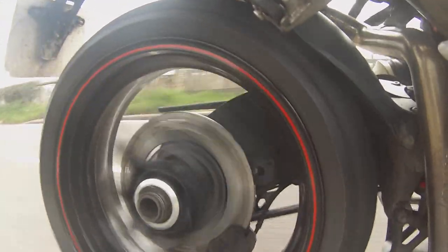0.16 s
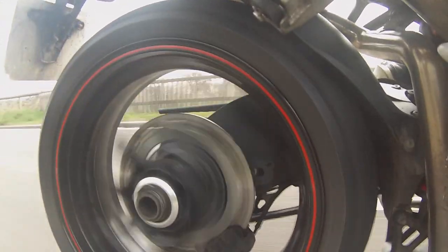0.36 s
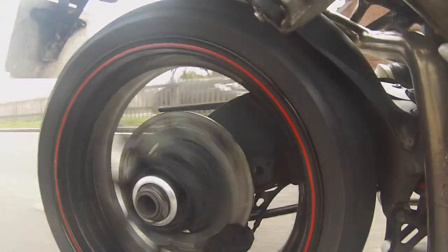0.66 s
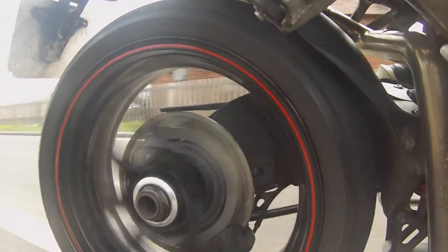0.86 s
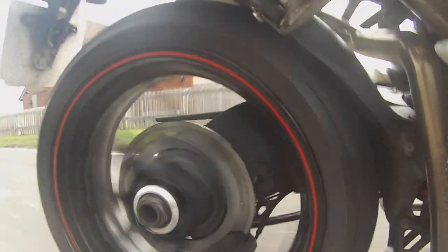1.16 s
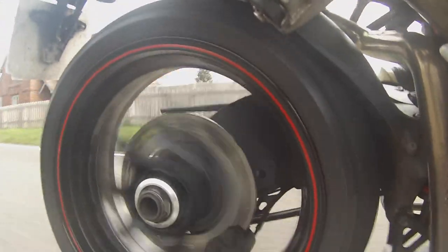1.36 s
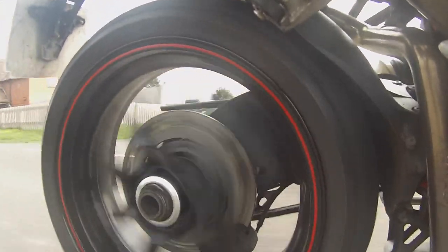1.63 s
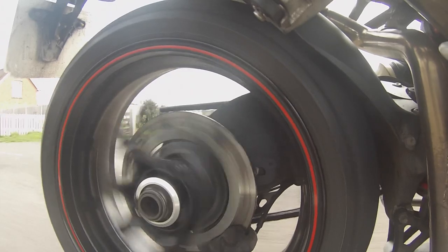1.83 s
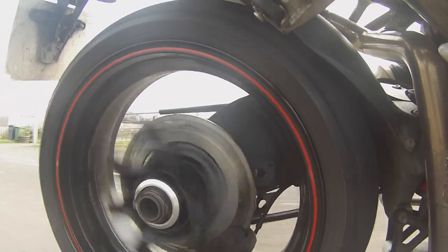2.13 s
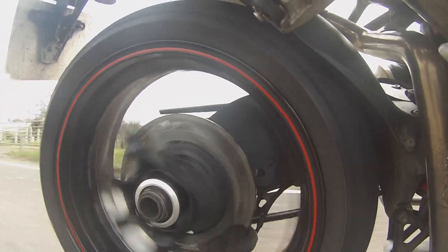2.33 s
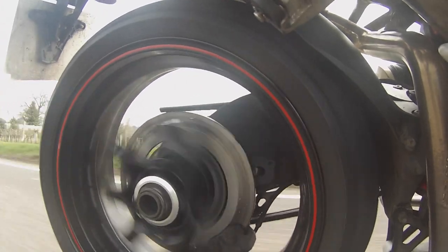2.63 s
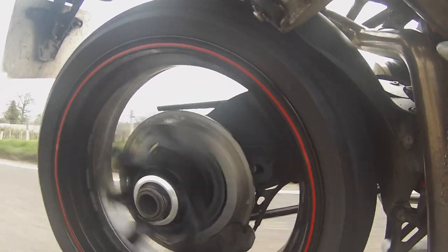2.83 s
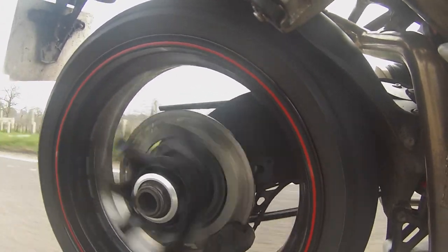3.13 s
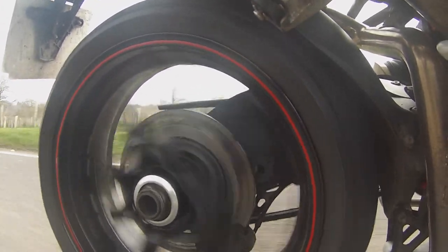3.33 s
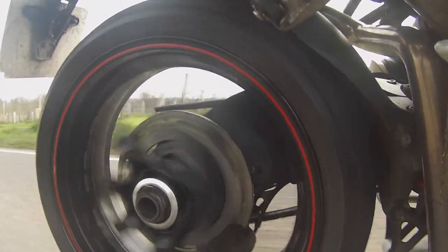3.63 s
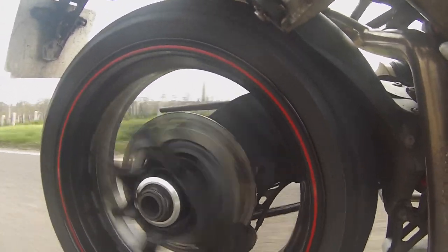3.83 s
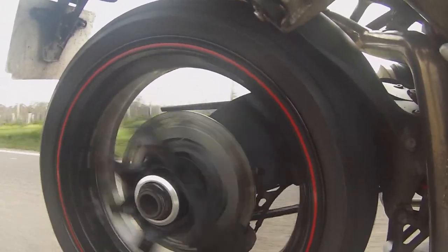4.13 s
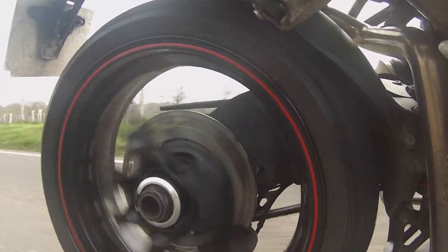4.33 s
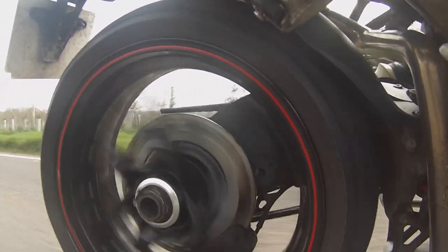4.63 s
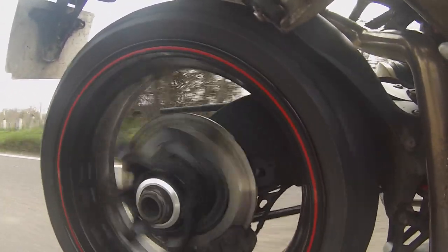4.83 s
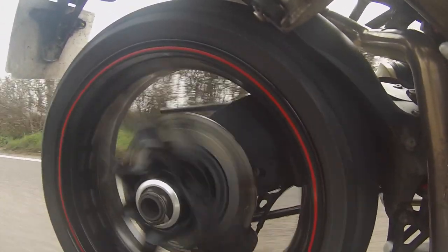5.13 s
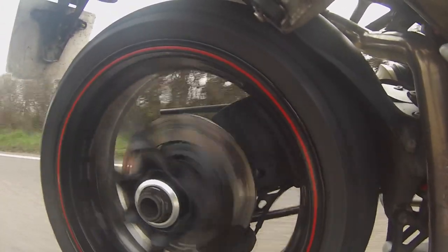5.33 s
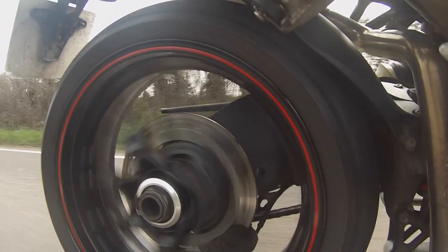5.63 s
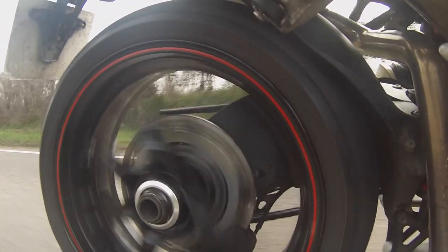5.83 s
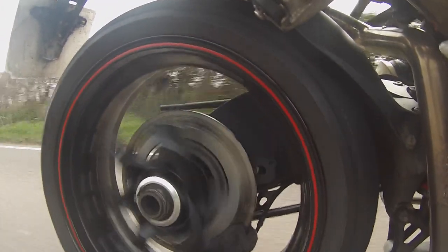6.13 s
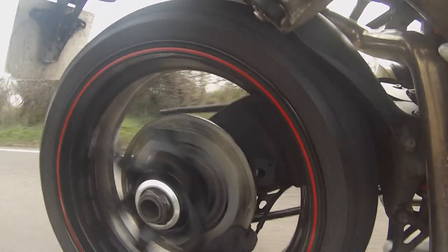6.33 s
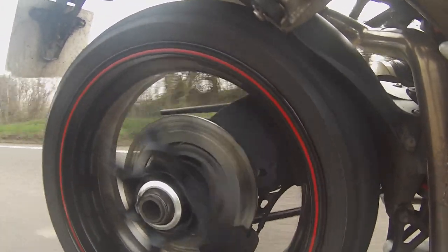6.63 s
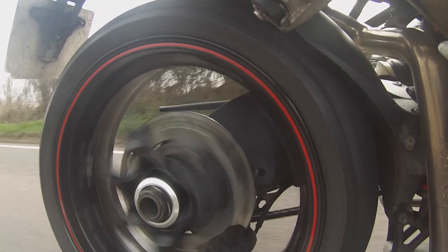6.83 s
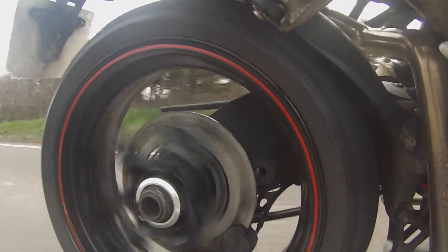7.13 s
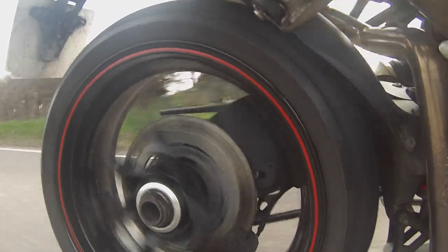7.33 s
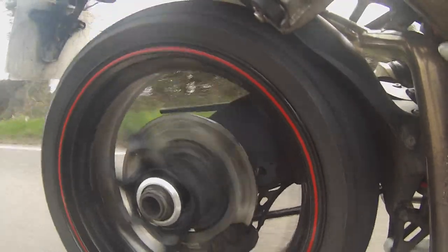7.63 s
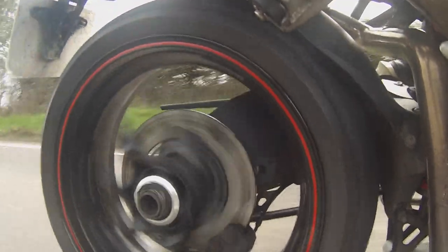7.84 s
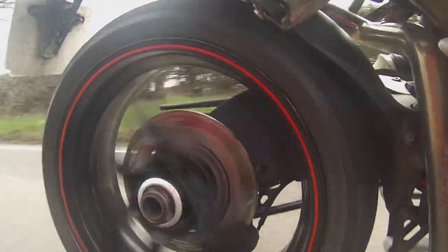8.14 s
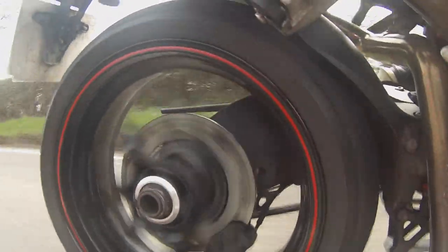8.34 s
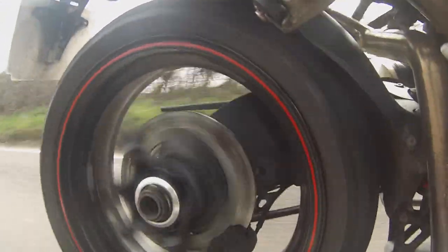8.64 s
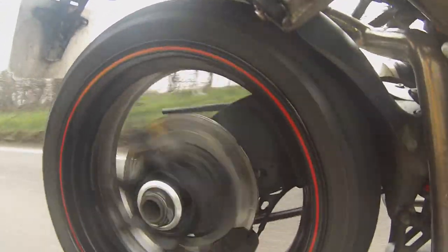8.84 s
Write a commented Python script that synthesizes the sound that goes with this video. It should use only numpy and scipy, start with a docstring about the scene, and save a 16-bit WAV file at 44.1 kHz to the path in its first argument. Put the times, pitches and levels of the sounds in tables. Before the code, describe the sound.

Close motorcycle engine alternating between a steady pulling drone and sputtering backfire pops, with faint gear whine and chain hiss.

```python
"""A three-cylinder motorcycle, heard from a camera mounted beside its rear wheel and silencer.
It coasts in with the throttle shut, burbling and popping as unburnt fuel goes off in the exhaust.
At 1.5 s it pulls with a firm drone, shuts off at 3.7 s and slows through a volley of pops, pulls again
from 5.9 s and shuts off at 8 s for a last few pops. Throughout, gears whine, valve gear, chain and
tyre hiss, and the loud pops make the limiter duck and swell back."""
import sys
import numpy as np
from scipy import signal
from scipy.fft import rfft, irfft, next_fast_len
from scipy.io import wavfile
from scipy.ndimage import uniform_filter1d

SR = 44100
rng = np.random.default_rng(int(sys.argv[2]) if len(sys.argv) > 2 else 0)


def transcribe(u):
    """Save the signal u as a 16-bit wav file named by the first command-line argument.

    u: samples, shape (n,) or (channels, n), limited to [-1, 1]; the rate is SR.
    q: integer samples, one column per channel.
    """
    v = np.clip(np.atleast_2d(u).T, -1, 1)
    q = np.round(v * 32767).astype(np.int16)
    wavfile.write(sys.argv[1], SR, q)


N = 395577
TIME = np.arange(N) / SR
POP_S, SHUT_S = 0.006, 0.1075   # nominal length of a pop; time to snap the throttle shut
# how far each cylinder fires over or under the mean: relative_strength
CYLINDERS = [1, -0.56, -0.22]
# each pull of the throttle: cracked_open_s, rolled_on_s, snapped_shut_s
PULLS = [(1.482, 1.544, 3.72), (5.938, 6.18, 7.99)]


def exhaust_note(turns, firing_hz, throttle, bark_db):
    """Harmonics of the firing rate: boom and drone locked in step, a looser bark above them."""
    # colour of the bark leaving the silencer: pitch_hz, relative_db
    bark_colour = [(285, 4.5), (330, 0.5), (355, 7), (385, 4), (445, 5.5), (480, -3.5), (570, -3.5),
                   (590, -17), (670, -9), (780, -14.5), (900, -15.5), (1050, -32), (1500, -42)]

    def order_wave(k, waver_db):
        """One harmonic with a wavering level; above the fourth its phase wanders too."""
        slip = .45 * max(k - 4, 0) * drift(1.5)
        waver = from_db((waver_db + 0.35 * (throttle - 0.5)) * drift(40))
        return -np.cos(2 * np.pi * k * turns + slip) * waver

    boom, drone = boom_and_drone(firing_hz, throttle)
    low = boom * order_wave(1, waver_db=0.9) + drone * order_wave(2, waver_db=0.9)
    gains = {k: at_hz(bark_colour, k * firing_hz) for k in range(3, 14)}
    bark = sum(gain * order_wave(k, waver_db=0.5) for k, gain in gains.items())
    bark /= np.sqrt(sum(gain * gain for gain in gains.values()))
    return np.sqrt(2) * (low + bark * from_db(bark_db))


def boom_and_drone(firing_hz, throttle):
    """Gains of the first two harmonics. Pulling pushes gas, coasting sucks it; in between they cancel."""
    # speeds the pipe favours: firing_hz, boom_coast_db, boom_pull_db, drone_coast_db, drone_pull_db
    pipe_tuning = [(93, -15, -32.5, -25, -18.5), (100.8, -17, -29.5, -19.5, -16.5),
                   (107.7, -19.5, -29, -17.5, -15), (118.3, -18, -30, -13, -15),
                   (118, -21.5, -25, -15.5, -15)]
    boom_coast, boom_pull, drone_coast, drone_pull = from_db(look_up(pipe_tuning, firing_hz))
    suction = (1 - throttle) ** 1.9
    return throttle * boom_pull - suction * boom_coast, throttle * drone_pull - suction * drone_coast


def pops(crack_hz=1050, swell_s=0.0007):
    """A short swell, then a spike of suction through the silencer; dull pops swell, sharp ones crack."""
    # unburnt fuel going off in the exhaust: time_s, level_db (over POP_S), sharpness_hz
    afterfires = [(0.378, 11, 840), (0.446, 0.5, 810), (0.587, 10, 920), (0.677, 0, 240), (0.764, 8.5, 700),
                  (0.877, 9.5, 770), (0.97, 10.5, 1250), (1.005, 1, 840), (1.17, 2.5, 241),
                  (1.346, -5.5, 260), (1.441, -10, 450), (1.513, -2.5, 360), (4.172, 0, 240),
                  (4.282, 6, 440), (4.416, 12.5, 910), (4.543, 12, 750), (4.618, 1.5, 362), (4.69, 9, 533),
                  (4.809, -3.5, 240), (4.886, 14, 1060), (4.932, 2, 383), (5.063, -3.5, 240),
                  (5.082, 10.5, 700), (5.187, 16, 710), (5.235, 4, 524), (5.312, -2.5, 240),
                  (5.418, 11.5, 240), (5.457, 2.5, 583), (5.626, 14, 850), (5.675, 1, 670),
                  (5.803, 13, 573), (5.954, 10.5, 870), (5.995, 1, 990.0), (6.035, -0.5, 755.3),
                  (6.077, -3.5, 890), (6.148, 10, 816), (6.23, 1, 650), (8.225, -1.5, 300),
                  (8.354, -2.5, 260), (8.613, 2.5, 240), (8.776, -0.5, 300), (8.911, 16.5, 660)]
    out = np.zeros(N + SR)
    t = np.arange(-SR // 200, SR // 40) / SR   # zero at the spike
    outlet = signal.butter(1, 110, "high", fs=SR, output="sos")   # a small opening radiates little bass
    for time_s, level_db, sharp_hz in afterfires:
        angle = 2 * np.pi * sharp_hz * np.abs(t)
        crackle = 1 + 0.14 * rng.standard_normal(len(t))
        crack = (sharp_hz / crack_hz) ** 4 * np.exp(-angle) * crackle
        spike = 1 / np.cosh(angle) + crack
        lead_s = 0.00094 + 0.17 / sharp_hz
        swell = 0.34 * (crack_hz / sharp_hz) ** 0.4 * np.exp(-((t + lead_s) / swell_s) ** 2)
        pop = signal.sosfilt(outlet, silencer(swell - spike / spike.max(), direct_db=-10))
        pop /= np.sqrt(np.sum(pop ** 2) / (POP_S * SR))
        start = round((time_s + t[0]) * SR)
        out[start:start + len(t)] += from_db(level_db) * pop
    return out[:N]


def burble(turns, soften_hz=620):
    """No two firings are alike: their excess puffs through the silencer, on a bed of turbulent gas."""
    # turbulence at the outlet: frequency_hz, relative_db
    gas_colour = [(25, -45), (55, -18), (90, -13), (150, -29), (250, 2), (380, -1), (520, -2.5),
                  (700, -17.5), (900, -15.5), (1400, -20.5), (3000, -71)]
    firings = np.flatnonzero(np.diff(np.floor(turns)))
    puffs = np.zeros(N)
    puffs[firings] = np.resize(CYLINDERS, len(firings)) + rng.standard_normal(len(firings))
    puffs = signal.sosfilt(signal.butter(4, soften_hz, fs=SR, output="sos"), puffs)
    gas = coloured(rng.standard_normal(N), gas_colour)
    return from_db(-6) * rms_one(silencer(puffs)) + from_db(-2) * gas


def chuffing():
    """Missed firings, heard as a bed of low, breathy noise."""
    # colour of the chuffing: frequency_hz, relative_db
    chuff_colour = [(15, -49), (30, -23), (55, 5.5), (80, 0.5), (130, 7), (220, -9.5), (600, -64)]
    return coloured(rng.standard_normal(N), chuff_colour)


def silencer(x, direct_db=-20, echo_s=0.00442):
    """A pressure pulse rings the can and returns once from the far end of the pipe."""
    # resonances of the can: pitch_hz, width_hz, gain_db
    can_modes = [(270, 180, 5), (406, 340, -8.5), (680, 133, 4.5), (1370, 1400, 2.5)]
    ring = resonate(x, can_modes) + from_db(direct_db) * x
    t = TIME[:len(x)]
    return ring + 0.074 * np.interp(t - echo_s, t, ring, left=0)


def rasp_and_hiss(turns, rasp_db, hiss_db):
    """Gas rasps in a spurt at each firing; valve gear, chain and tyre hiss on; both ring the housing."""
    # exhaust rasp and buzzing mount: frequency_hz, relative_db
    rasp_colour = [(300, -25), (700, 6.5), (1050, -1), (1500, -1.5), (1900, 1), (2450, -1), (2900, -12.5),
                   (3150, -4.5), (3550, -2.5), (3900, -13), (5000, -15), (6200, -21.5), (8000, -27),
                   (15000, -53)]
    # valve gear, chain and tyre: frequency_hz, relative_db
    hiss_colour = [(1500, 3.5), (3400, 9), (4200, -0.5), (5100, 3.5), (6400, -2), (7000, -7.5), (7600, -7),
                   (9300, -3.5), (10500, -5.5), (11700, 0.5), (13200, -4.5), (15500, -12)]
    # ringing of the camera housing and its bracket: pitch_hz, width_hz, gain_db
    housing_modes = [(1010, 19, 6), (1919, 29, -0.5), (2427, 110, -4), (3153, 45, 2.5), (3408, 40, 3),
                     (3480, 18, 4), (6975, 157, 7.5)]
    spurts = 1 + 0.19 * np.cos(2 * np.pi * turns)
    rasp = coloured(clatter(turns, repeat=0.92), rasp_colour) * spurts * from_db(drift(70))
    hiss = coloured(clatter(turns, repeat=0.75), hiss_colour)
    hiss *= from_db(1.7 * drift(90) + 1.5 * drift(26))   # the chain flutters and surges
    rasp = band_one(rasp + resonate(rasp, housing_modes), band_hz=(1400, 4000))
    hiss = band_one(hiss + resonate(hiss, housing_modes), band_hz=(8000, 15000))
    return from_db(rasp_db - 1.0) * rasp + from_db(hiss_db - 1.5) * hiss


def clatter(turns, repeat, size=1200):
    """Fresh noise plus a pattern that returns with every engine cycle of three firings."""
    cycle = turns / len(CYLINDERS) % 1
    pattern = np.interp(cycle * size, np.arange(size), rng.standard_normal(size))
    return rng.standard_normal(N) + repeat * pattern


def gear_whine(turns, firing_hz, teeth_per_firing=32 / 3, waver_db=2.0):
    """Loaded teeth mesh 32 times in each engine cycle; a growl sounds an octave below."""
    # how the gearbox casing passes the mesh tone: pitch_hz, gain_db
    casing = [(1000, -1.5), (1190, 2), (1220, -3), (1245, -8.5)]
    mesh = 2 * np.pi * teeth_per_firing * turns + .35 * drift(25)
    growl = from_db(waver_db * drift(15)) * np.sin(mesh / 2)
    whine = from_db(waver_db * drift(20)) * np.sin(mesh)
    return at_hz(casing, teeth_per_firing * firing_hz) * (whine + growl)


def throttle_opening(crack_opening=0.39, crack_s=0.046, roll_s=0.19):
    """The rider cracks the throttle and rolls it on; `held` falls from 1 to 0 as it snaps shut."""
    opening, held = np.zeros((2, N))
    for crack_at, roll_at, shut_at in PULLS:
        cracked = crack_opening * np.clip((TIME - crack_at) / crack_s, 0, 1)
        rolled = (1 - crack_opening) * (1 - np.exp(-np.maximum(TIME - roll_at, 0) / roll_s))
        grip = (TIME > crack_at) * np.clip(1 - (TIME - shut_at) / SHUT_S, 0, 1)
        opening += (cracked + rolled) * (grip > 0)
        held += grip
    return np.clip(opening, 0, 1), held


def just_shut(settle_s=0.18):
    """Rises to 1 as the throttle closes, then fades as the pipe fills with unburnt fuel."""
    lull = np.zeros(N)
    for _, _, shut_at in PULLS:
        closing = np.clip((TIME - shut_at) / SHUT_S, 0, 1)
        lull += closing * np.exp(-np.maximum(TIME - shut_at - SHUT_S, 0) / settle_s)
    return lull


def from_db(db):
    """Decibels to gain."""
    return 10 ** (np.asarray(db) / 20)


def rms_one(x):
    """Scale to unit power."""
    return x / np.sqrt(np.mean(x ** 2) + 1e-20)


def band_one(x, band_hz):
    """Scale to unit power inside one band."""
    return x / np.std(signal.sosfilt(signal.butter(2, band_hz, "band", fs=SR, output="sos"), x))


def look_up(rows, control):
    """A table's other columns, read where its first column equals the control."""
    steps, *columns = np.transpose(rows)
    return [np.interp(control, steps, column) for column in columns]


def at_hz(colour, hz):
    """Gain of an EQ curve at these frequencies."""
    points_hz, db = np.transpose(colour)
    return from_db(np.interp(np.log(hz + 1e-9), np.log(points_hz), db))


def coloured(x, colour):
    """Shape a signal with an EQ curve, at unit power."""
    size = next_fast_len(N)
    gains = at_hz(colour, np.fft.rfftfreq(size, 1 / SR))
    return rms_one(irfft(rfft(x, size) * gains, size)[:N])


def drift(rate_hz):
    """A random wander at unit power."""
    knots = rng.standard_normal(int(N / SR * rate_hz) + 2)
    return rms_one(np.interp(TIME * rate_hz, np.arange(len(knots)), knots))


def resonate(x, modes):
    """Ring a bank of parallel resonances."""
    out = 0
    for pitch_hz, width_hz, gain_db in modes:
        r = np.exp(-np.pi * width_hz / SR)
        poles = [1, -2 * r * np.cos(2 * np.pi * pitch_hz / SR), r * r]
        out += from_db(gain_db) * (1 - r * r) / 2 * signal.lfilter([1, 0, -1], poles, x + 1e-18)
    return out


def limiter(x, ceiling_db=-9.0, release_s=0.54):
    """Gain ducks just ahead of any burst over the ceiling, then creeps back."""
    level = np.sqrt(np.abs(uniform_filter1d(x ** 2, int(POP_S * SR))) + 1e-12)
    cut = np.maximum(1 - from_db(ceiling_db) / level, 1e-9)
    fading_cut = np.exp(np.maximum.accumulate(np.log(cut) + TIME / release_s) - TIME / release_s)
    return x * (1 - uniform_filter1d(fading_cut, size=90))


def scene():
    """A close mono mix: throttle and engine speed ride the running layers, and the pops land on top."""
    # engine speed: time_s, firing_hz
    engine_speed = [(0, 124.4), (0.8, 117.3), (1.1, 114), (1.8, 111.2), (1.95, 112.9), (2.05, 110.4),
                    (2.45, 110.9), (2.8, 112.8), (3.4, 117), (3.65, 117.3), (3.82, 115), (4.15, 113),
                    (5.85, 99.4), (6.45, 97.2), (6.65, 95.3), (7.97, 95.2), (8.12, 92.8), (8.97, 91.2)]
    # base mix under load: opening (0-1), bark_db, burble_db, chuff_db, rasp_db, hiss_db, whine_db
    load_mix = [(0, -25.5, -17.5, -25, -28, -52.5, -37), (.35, -32.5, -23.5, -24, -35.5, -57, -48),
                (.85, -22, -18, -23.5, -32, -56, -49), (1, -18.5, -23.5, -47, -33.5, -51, -33.5)]
    firing_hz, = look_up(engine_speed, TIME)
    turns = np.cumsum(firing_hz * (1 + 0.001467 * drift(40))) / SR   # firings so far
    octaves = np.log2(firing_hz / 108)   # above mid speed; tilts the levels in dB per octave
    opening, held = throttle_opening()
    lull = just_shut()   # misfiring takes a moment to build up
    pulling = np.array(look_up(load_mix, opening))
    coasting = np.array(look_up(load_mix, [0]))
    levels = held * pulling + (1 - held) * coasting   # a snap skips part throttle
    bark_db, burble_db, chuff_db, rasp_db, hiss_db, whine_db = levels
    note = exhaust_note(turns, firing_hz, opening * held, bark_db - 5.5 * octaves)
    rough = from_db(burble_db - 8 * octaves - 3 * lull) * burble(turns)
    chuff = from_db(chuff_db - 10 * octaves - 15 * lull) * chuffing()
    treble = rasp_and_hiss(turns, rasp_db - 1.5 * octaves, hiss_db - 3 * octaves)
    whine = from_db(whine_db) * gear_whine(turns, firing_hz)
    return (note + rough + chuff + treble + whine + pops())[None]


def record(dry, cutoff_hz=15300):
    """The limiter pumps, the sharpest spikes overload, and a steep filter takes off the top."""
    clipped = np.clip(limiter(dry[0]), -1, 1)
    return signal.sosfilt(signal.ellip(10, .1, 90, cutoff_hz, fs=SR, output="sos"), clipped)[None]


dry = scene()
out = record(dry)
transcribe(out)
```